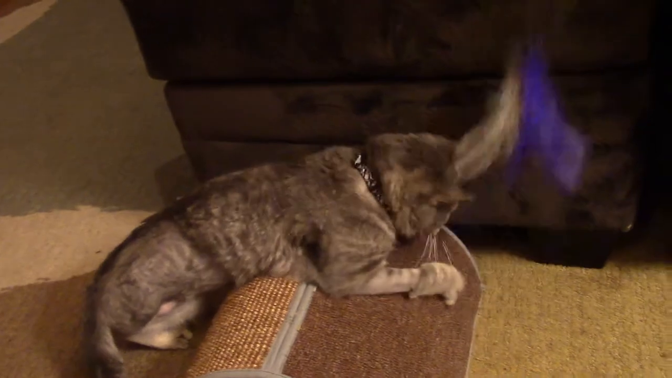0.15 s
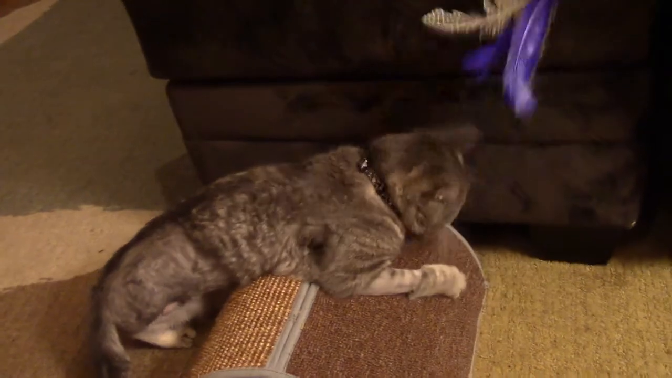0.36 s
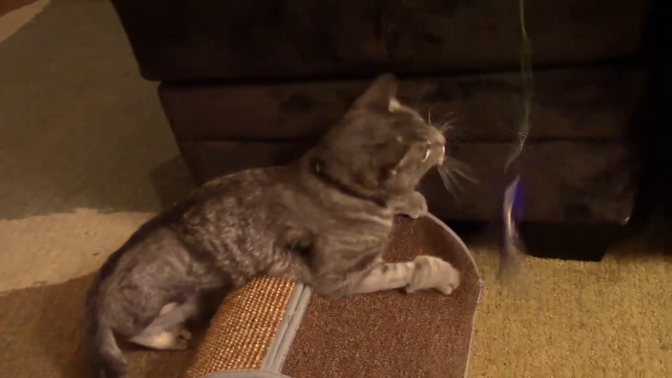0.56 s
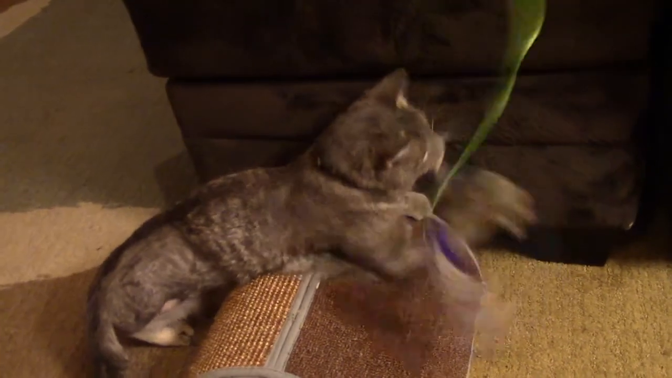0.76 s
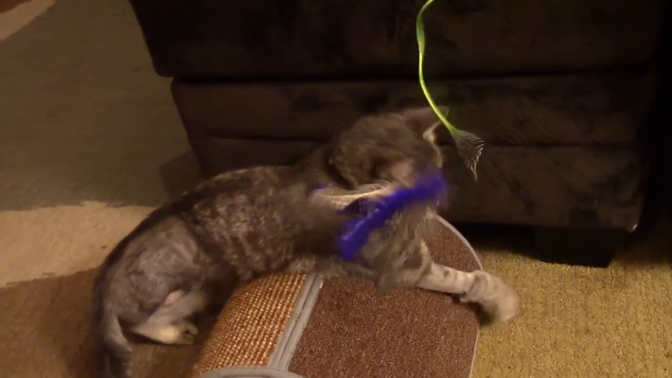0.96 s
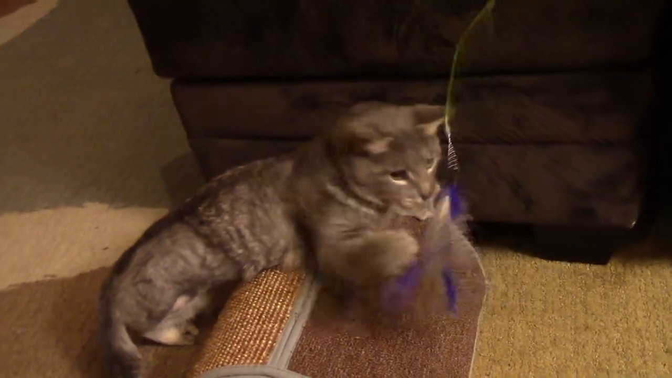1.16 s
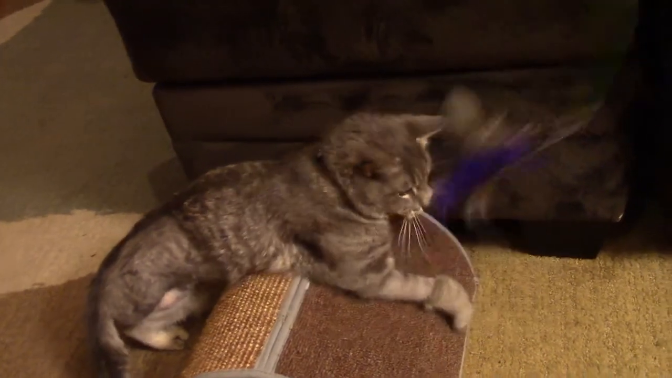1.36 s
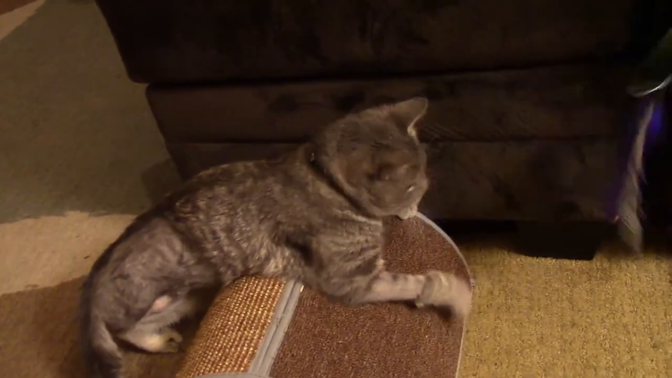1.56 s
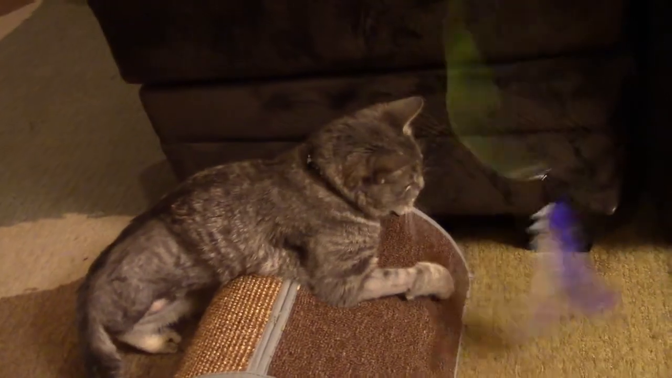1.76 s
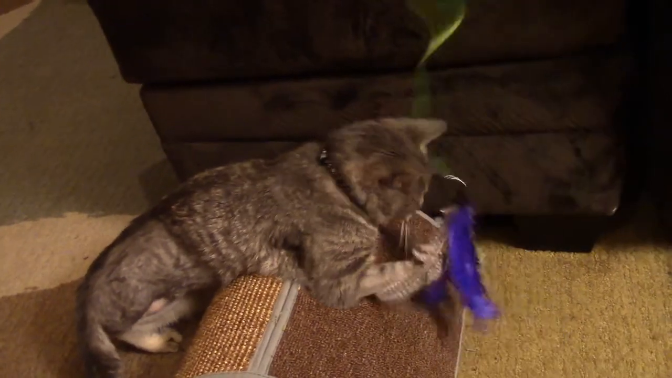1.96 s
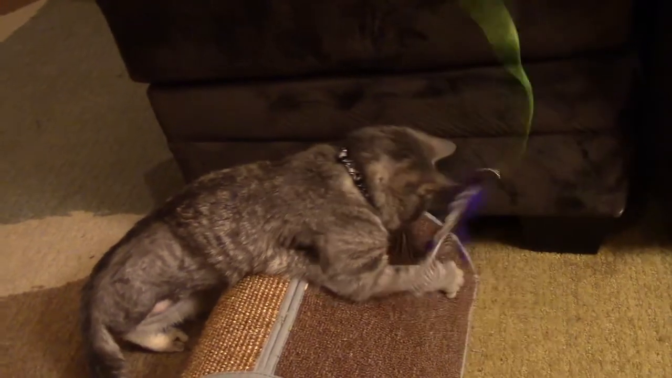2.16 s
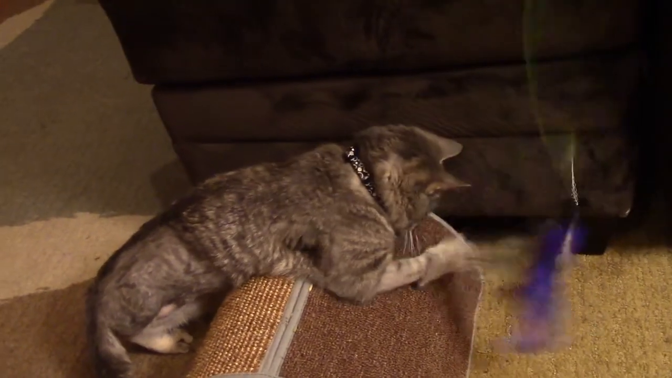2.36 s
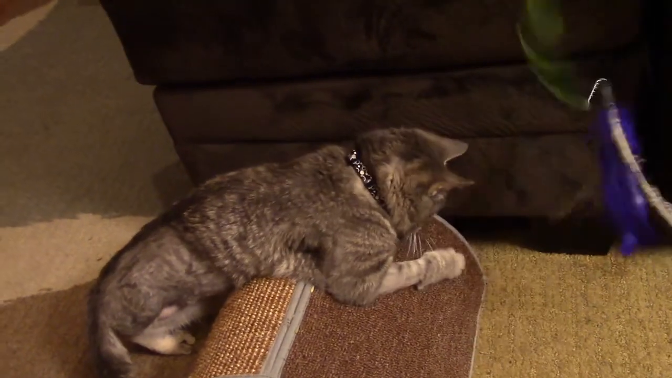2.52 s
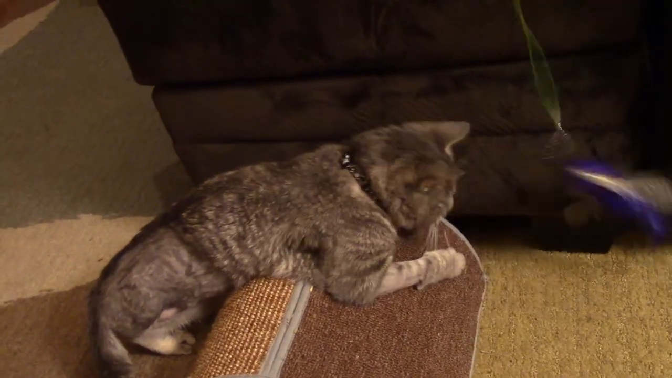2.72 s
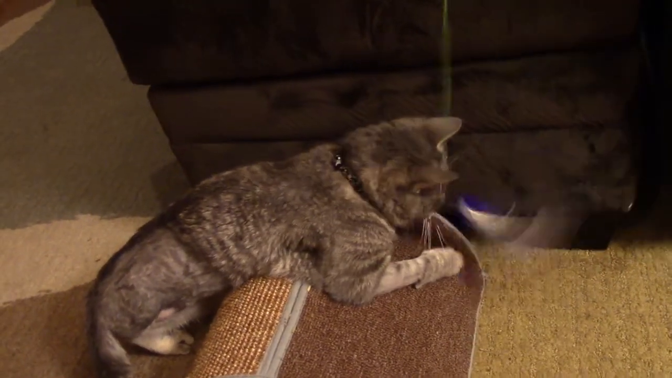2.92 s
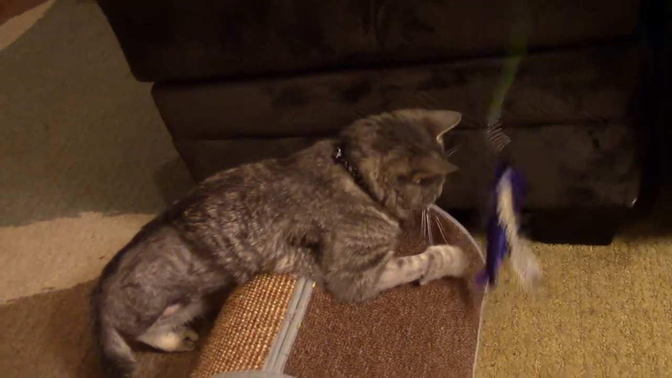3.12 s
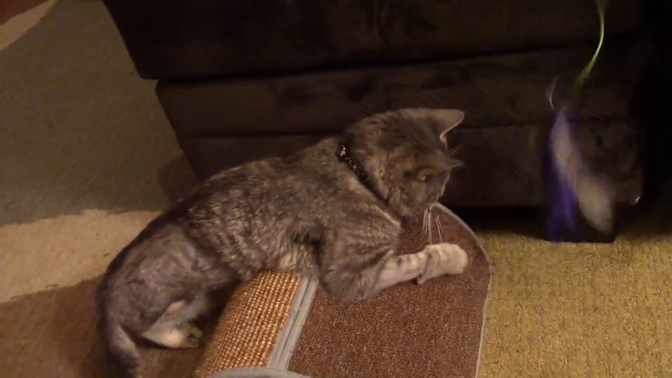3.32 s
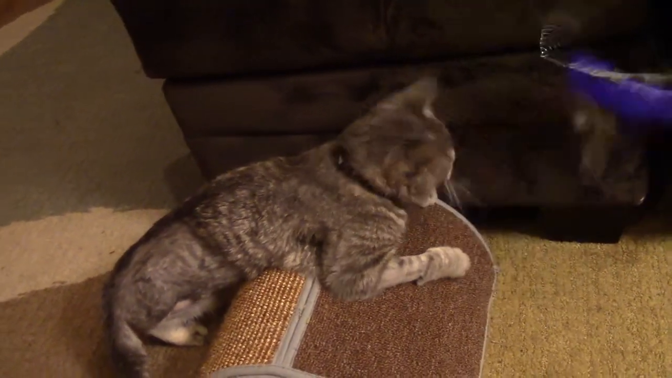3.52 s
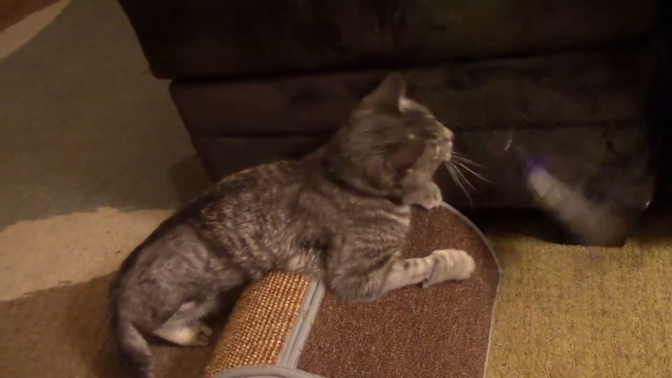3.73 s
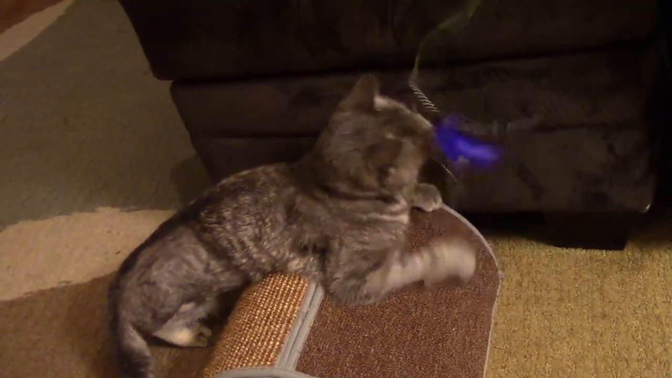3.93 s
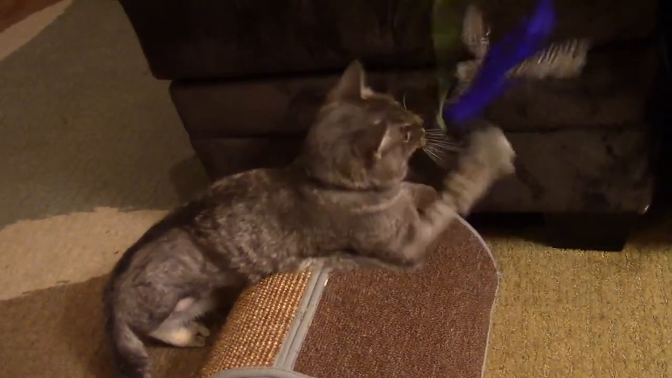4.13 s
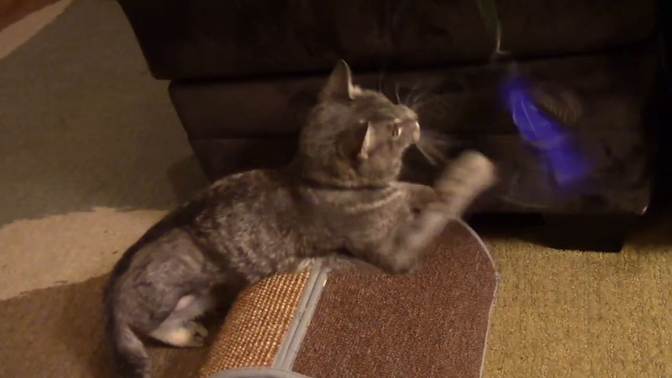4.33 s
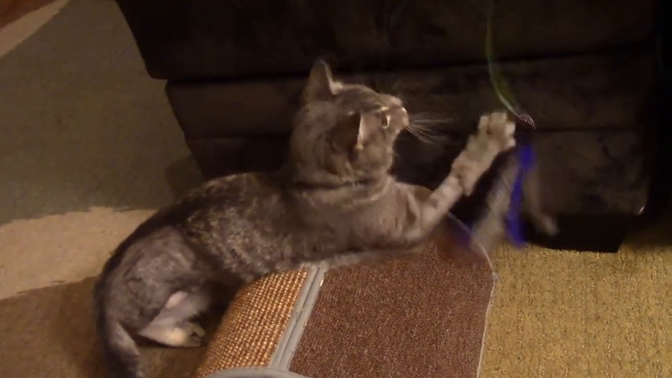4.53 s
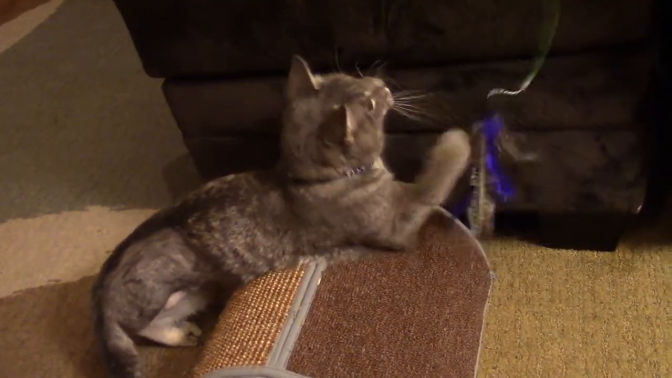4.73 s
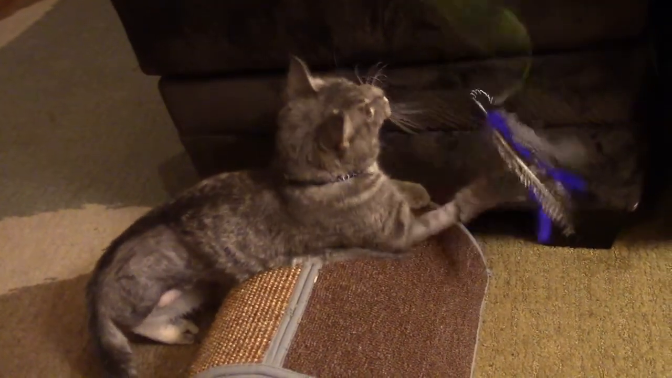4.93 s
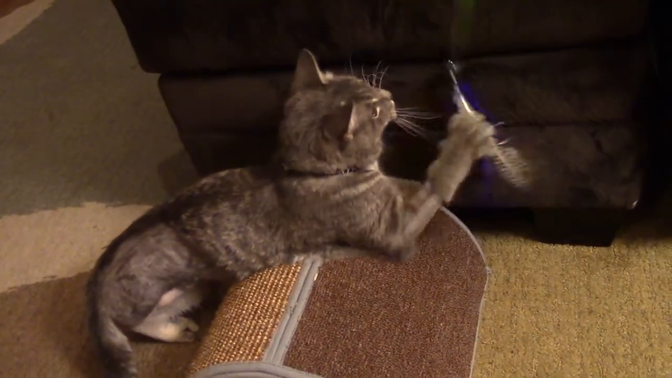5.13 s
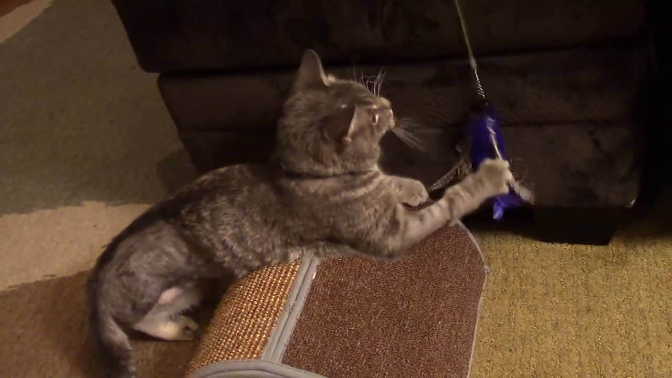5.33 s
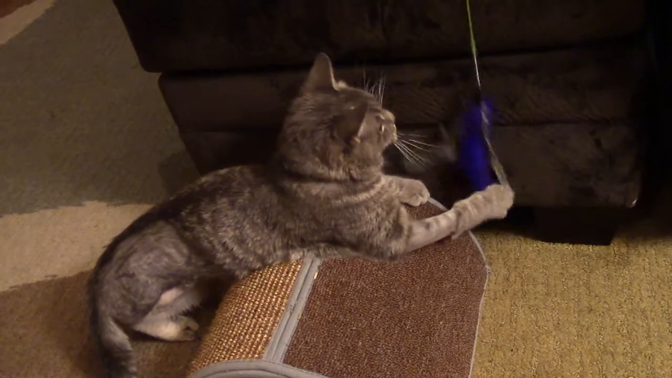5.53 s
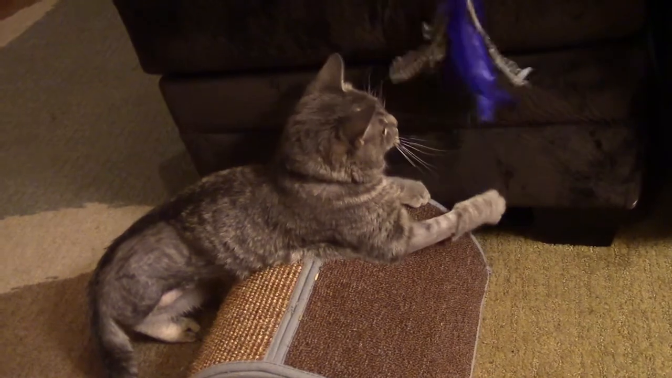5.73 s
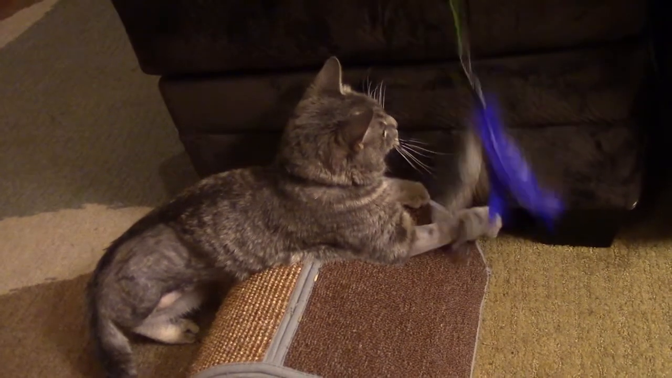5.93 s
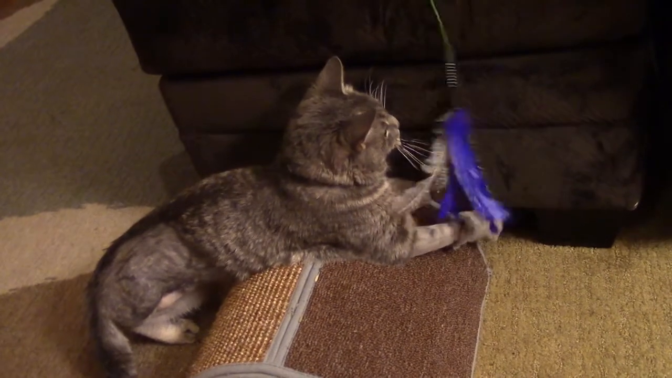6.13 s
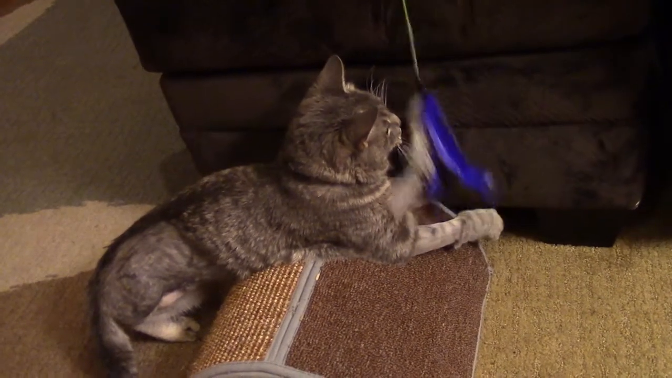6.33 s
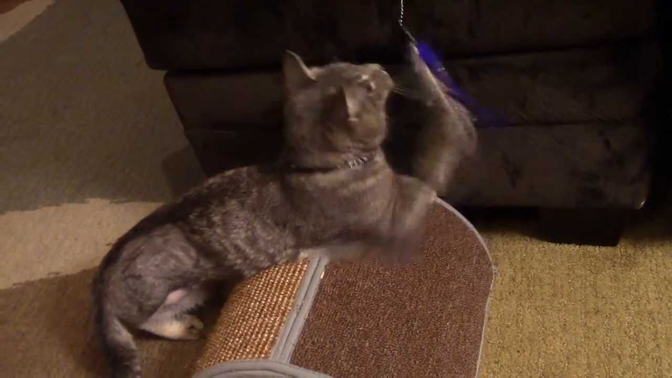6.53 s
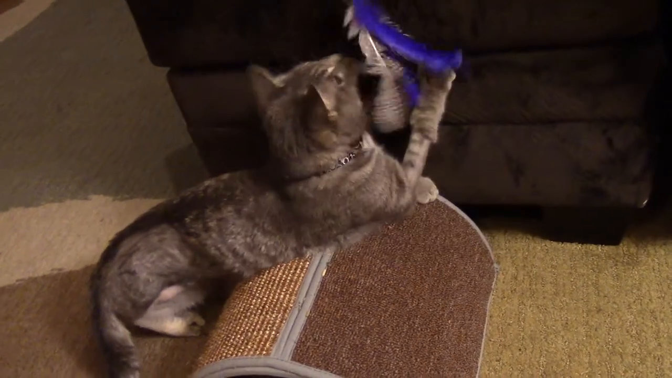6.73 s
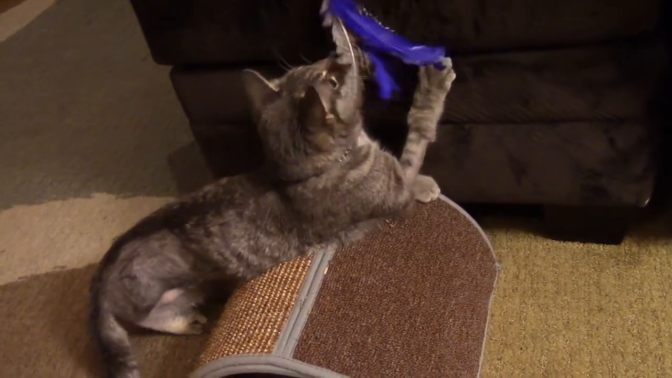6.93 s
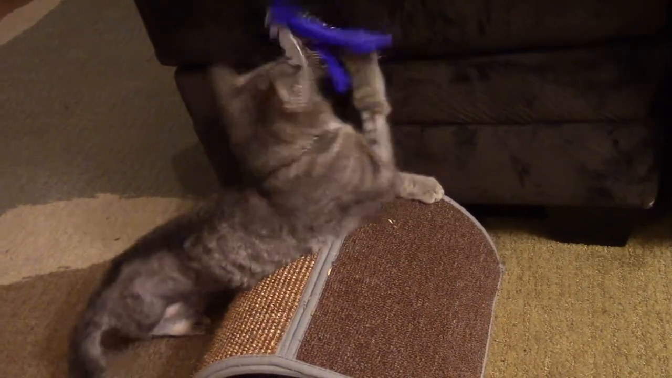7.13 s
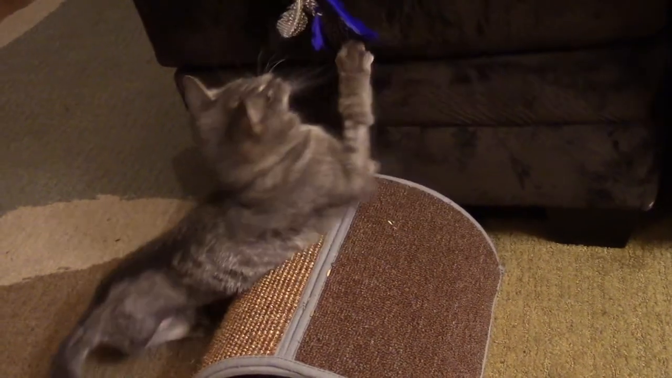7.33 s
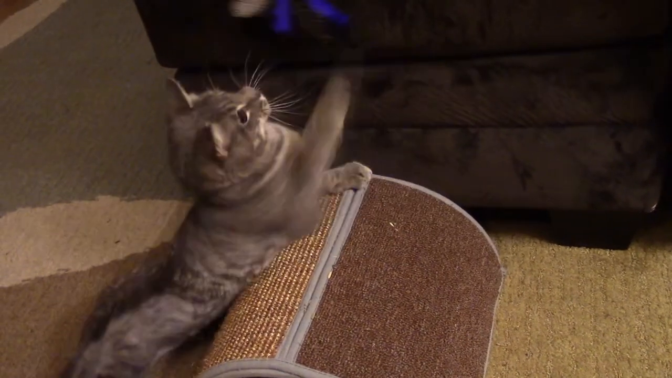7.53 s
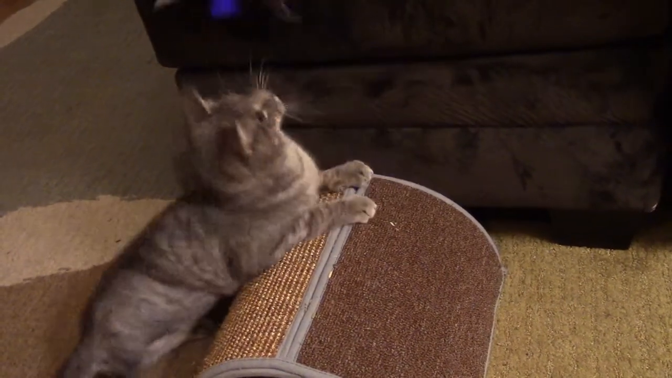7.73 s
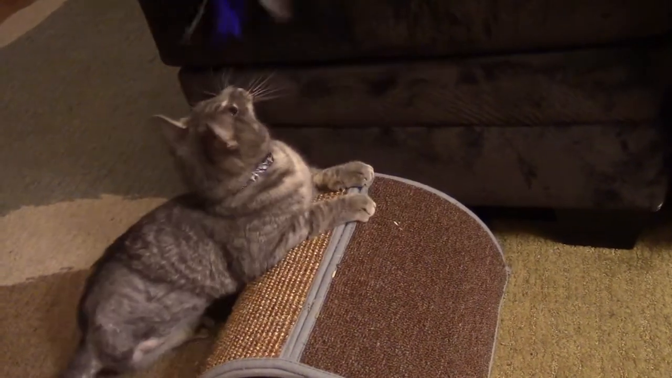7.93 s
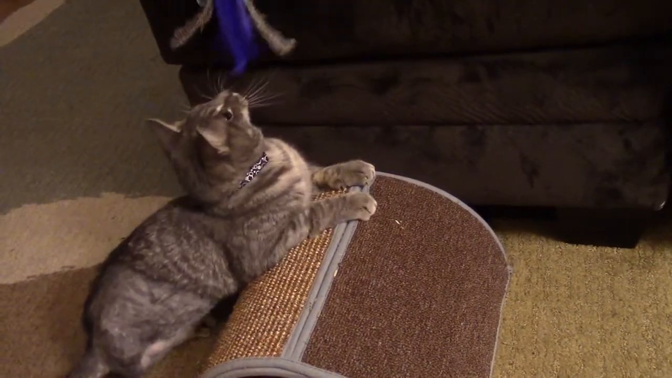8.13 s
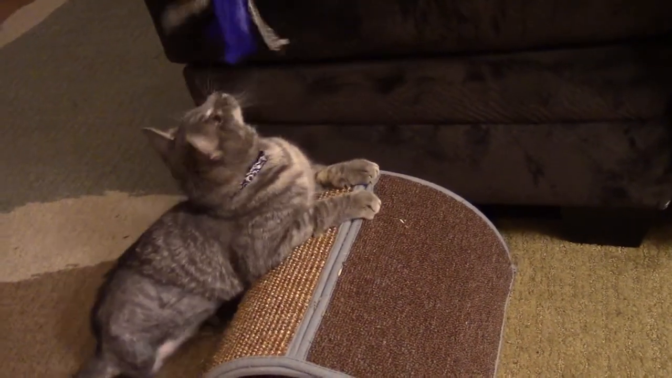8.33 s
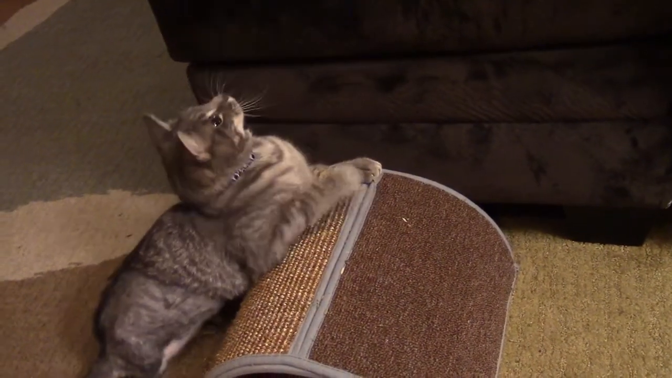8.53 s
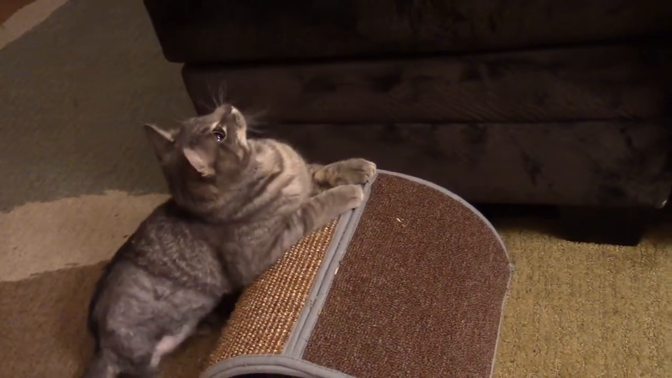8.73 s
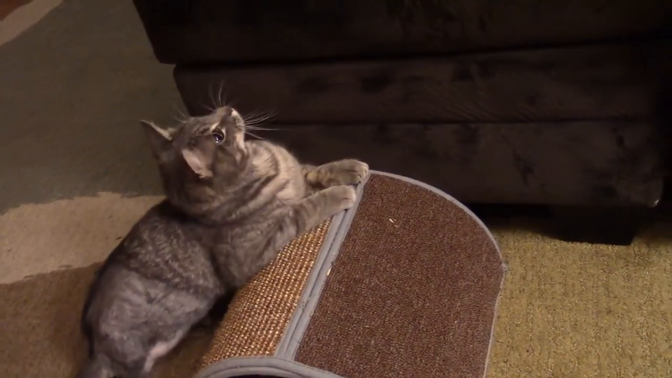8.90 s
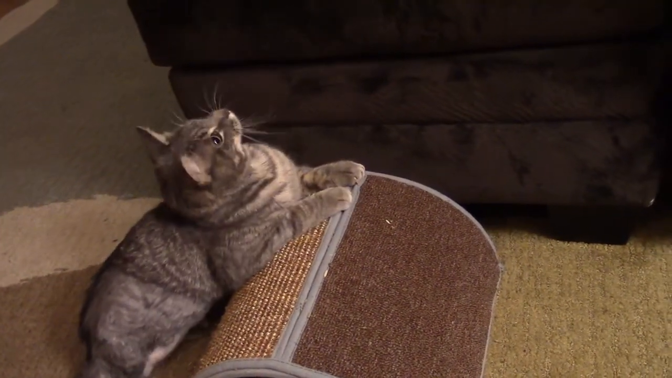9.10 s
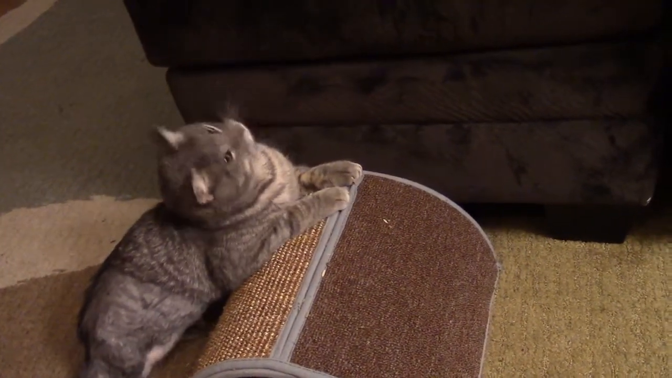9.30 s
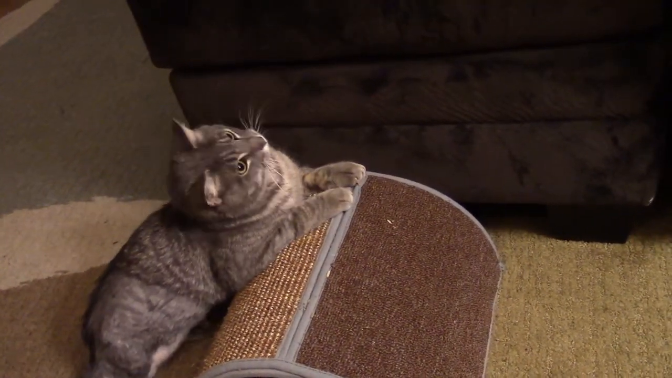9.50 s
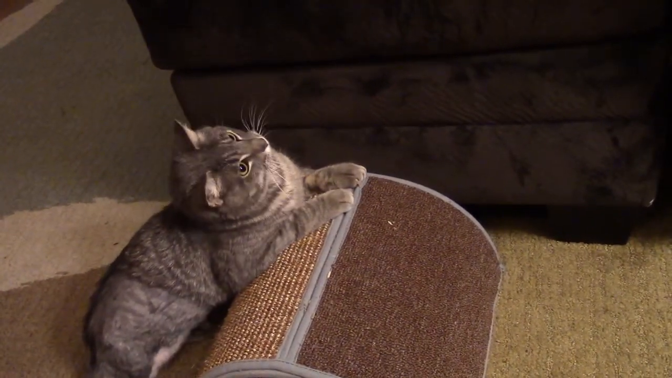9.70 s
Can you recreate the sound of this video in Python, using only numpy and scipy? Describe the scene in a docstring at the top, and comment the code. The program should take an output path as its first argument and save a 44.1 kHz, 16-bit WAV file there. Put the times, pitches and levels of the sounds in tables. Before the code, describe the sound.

Close up in a small, softly furnished room, a cat bats a feather toy on a carpeted scratcher. A busy opening flurry of clicks, claw scrapes and muffled hollow thumps thins to scattered taps, with a sharp clack near five seconds. The heaviest paw thuds come just after seven seconds, then a few light scratches fade into faint hum and soft shuffling.

```python
"""A cat's paws thump a hollow, carpeted scratcher as it lies there batting at a feather toy on a wand.
Each paw rings the board's modes and slaps its cover; claws and clasp tick and clack as damped resonances.
Dragged claws pluck the weave, and feathers and fur hiss over it as grainy filtered noise.
Soft shuffling, room hum, a deep drone and a faint whine lie under the play.
The room is small and soft; the camera's microphones are close, and the play is nearly mono."""
import sys
import numpy as np
from scipy import signal
from scipy.fft import rfft, irfft, next_fast_len
from scipy.io import wavfile
from scipy.ndimage import uniform_filter1d, map_coordinates

SR = 44100
rng = np.random.default_rng(int(sys.argv[2]) if len(sys.argv) > 2 else 0)


def generate_wav(signal):
    """Clip the signal to [-1, 1] and save it as 16-bit WAV at the path in sys.argv[1]."""
    frames = np.transpose(np.atleast_2d(signal))
    scaled = np.clip(frames, -1, 1) * 32767
    pcm = np.round(scaled).astype(np.int16)
    wavfile.write(sys.argv[1], SR, pcm)


N = 430411

# the room's air: pitch_hz [Hz], level_db [dB, relative]
AIR_SPECTRUM = [(15, -51), (25, -40), (37, -5), (50, -11.5), (76, -4), (133, -1), (241, -0.5), (307, -7.5),
                (486, -4), (749, -8), (1090, -12.5), (1250, -9.5), (2730, -16), (5370, -20), (15800, -36)]
# a faint, deep drone that comes and goes: time_s [s], level_db [dB]
DRONE_LEVEL = [(0, -70), (1.1, -70.5), (1.8, -77.5), (3.1, -67.5), (3.45, -86), (9.76, -82)]
# colour of that drone: pitch_hz [Hz], level_db [dB, relative]
DRONE_SPECTRUM = [(35, -34), (62, -16), (74, -5), (110, -31), (300, -72)]
# left-right likeness of the diffuse sounds: pitch_hz [Hz], likeness [0 to 1]
STEREO_LIKENESS = [(30, 0.48), (70, 0.92), (200, 0.66), (600, 0.59), (2000, 0.61), (5000, 0.91),
                   (12000, 0.99)]
# how long the room rings: pitch_hz [Hz], t60_s [s]
ROOM_DECAY = [(100, 0.3), (300, 0.46), (700, 0.33), (2000, 0.26), (5000, 0.39), (12000, 0.074)]
# what the furnishings send back: pitch_hz [Hz], level_db [dB, relative]
WALL_SPECTRUM = [(80, 3.5), (200, -7.5), (600, -2.5), (2200, -4.5), (4000, -10.5), (12000, -11)]
# soft shuffling of cat and wand, ahead of the layer trims: time_s [s], level_db [dB]
STIR_LEVEL = [(0, -55), (.35, -57), (3.5, -57.5), (6.3, -61.5), (7.1, -58.5), (9.76, -62.5)]
# colour of the shuffling: pitch_hz [Hz], level_db [dB, relative]
SHUFFLE_SPECTRUM = [(60, -22), (170, -7.5), (300, 3.5), (550, -4), (900, -3), (1500, -17), (2500, -15),
                    (5000, -30), (12000, -44)]
# feathers and fur brushing the cover, ahead of the layer trim: start_s [s], length_s [s], level_db [dB]
SWISH_STROKES = [(0, 0.069, -49.5), (0.165, 0.029, -59.5), (0.56, 0.038, -62.5), (0.698, 0.06, -60),
                 (1.065, 0.054, -61), (1.131, 0.032, -60.5), (1.169, 0.021, -54.5), (1.228, 0.036, -52),
                 (1.279, 0.055, -61), (1.356, 0.064, -58.5), (1.52, 0.042, -65.5), (1.68, 0.015, -64),
                 (2.266, 0.021, -58), (2.619, 0.027, -63.5), (3.302, 0.034, -65), (3.388, 0.024, -64),
                 (4.036, 0.052, -55.5), (4.119, 0.036, -67), (4.261, 0.036, -63), (4.839, 0.036, -56),
                 (5.007, 0.07, -62.5), (5.171, 0.089, -51.5), (5.276, 0.16, -66.5), (5.423, 0.21, -62),
                 (6.353, 0.15, -69.5), (6.555, 0.065, -60), (6.624, 0.065, -59.5), (7.016, 0.29, -66.5),
                 (7.088, 0.053, -62.5), (7.519, 0.058, -60), (7.65, 0.078, -65.5), (8.469, 0.034, -61)]
# colour of barbs and hairs: pitch_hz [Hz], level_db [dB, relative]
FEATHER_SPECTRUM = [(200, -15), (900, 4.5), (2200, 0.5), (3700, -0.5), (4700, -2), (6200, 1), (8000, -2.5),
                    (10500, -3), (13000, -7), (16000, -19)]
# claws dragging through the rough cover, ahead of the layer trim: start_s [s], length_s [s], level_db [dB]
CLAW_DRAGS = [(0.07, 0.034, -40), (0.17, 0.072, -52), (0.614, 0.023, -48.5), (1.53, 0.007, -50),
              (2.231, 0.054, -58.5), (2.46, 0.03, -68), (3.066, 0.032, -60), (4.539, 0.022, -55.5),
              (5.193, 0.065, -51.5), (7.208, 0.034, -52), (7.583, 0.043, -53), (7.662, 0.015, -46),
              (8.403, 0.026, -60), (8.464, 0.049, -52.5), (8.641, 0.031, -58.5), (8.943, 0.062, -62.5)]
# colour of plucked fibres: pitch_hz [Hz], level_db [dB, relative]
WEAVE_SPECTRUM = [(70, -22), (200, -4), (600, 0.5), (1100, 2), (1700, -2.5), (2300, -0.5), (3100, -10),
                  (4300, -19.5), (12000, -36)]
# claws, clasp and wand making contact: start_s [s], level_db [dB], pitch_hz [Hz], snap_db [dB, relative]
HARD_CONTACTS = [(0.0187, -43, 900, 8.5), (0.0412, -36, 3050, -1), (0.0626, -32.5, 1750, -30),
                 (0.0745, -29.5, 780, -26), (0.0924, -37.5, 2020, -22), (0.192, -49, 2340, -9),
                 (0.315, -40, 1040, -13.5), (0.5754, -47.5, 900, -5), (0.6239, -31.5, 1990, -15),
                 (1.0851, -44.5, 1120, -4), (1.104, -61, 1520, 10), (1.2322, -45.5, 970, -6),
                 (1.3157, -42.5, 2500, -10), (1.3788, -50.5, 2200, -5), (1.534, -43.5, 1550, -12),
                 (1.7207, -52.5, 1490, 4.5), (2.2659, -49, 2420, -9), (2.4915, -52, 2500, -22),
                 (2.7176, -48, 890, -5.5), (3.1088, -41.5, 2300, -9.5), (3.3273, -52.5, 1150, -0.5),
                 (3.4837, -45.5, 1020, -4), (3.6417, -45, 1030, -6), (3.6674, -41.5, 850, -34),
                 (3.8276, -52.5, 1140, -1), (4.0778, -60, 3650, 9), (4.217, -45, 1380, -14),
                 (4.3836, -48.5, 1050, -2), (4.5337, -46.5, 2700, -8.5), (4.729, -28, 765, -17.5),
                 (4.733, -39.5, 1410, -28), (4.8592, -50.5, 3720, 0.5), (4.91, -57.5, 4170, 5),
                 (5.0427, -40.5, 930, -20), (5.2448, -29.5, 3920, -3), (5.2458, -33, 1450, -23),
                 (5.343, -47.5, 2410, -10), (5.5986, -52.5, 1360, -3), (6.5958, -56.5, 3560, 9.5),
                 (6.6078, -62, 4500, 13), (6.6435, -54.5, 3850, 4), (7.002, -38, 1460, -12.5),
                 (7.0089, -31, 940, -22), (7.0096, -36.5, 2850, -12), (7.181, -46.5, 2040, -10),
                 (7.214, -48, 2430, -8), (7.231, -38.5, 1890, -17), (7.2456, -44, 2320, -13),
                 (7.2607, -48, 2900, -16), (7.2711, -29, 2240, -20), (7.5326, -32, 1040, -6),
                 (7.7852, -45, 1730, -16), (7.8593, -43.5, 2400, -20), (8.4113, -49, 2450, -16),
                 (8.419, -43.5, 2100, -21), (8.4649, -34.5, 1720, -17.5)]
# snap of a hard tip: pitch_hz [Hz], level_db [dB, relative]
SNAP_SPECTRUM = [(1500, -22), (3800, 1.5), (5000, 2.5), (6500, 5.5), (8000, 3.5), (10700, 0.5), (13000, -7),
                 (16000, -10.5)]
# paws landing on the board: start_s [s], level_db [dB], pitch_hz [Hz, centre of the ring]
PAW_LANDINGS = [(0.02, -43.5, 388), (0.066, -32.5, 356), (0.382, -43, 330), (0.624, -38, 332),
                (1.086, -48.5, 315), (1.238, -42, 250), (1.318, -34, 228), (1.546, -39, 410),
                (1.557, -36, 189), (2.135, -39.5, 230), (2.267, -47, 292), (2.625, -44.5, 237),
                (3.496, -44.5, 207), (3.667, -34.5, 290), (4.177, -40, 165), (4.365, -45.5, 174),
                (4.7292, -32.5, 317), (4.963, -34.5, 168), (5.044, -37, 288), (5.223, -37.5, 240),
                (5.587, -55, 380), (5.989, -49.5, 262), (6.585, -49.5, 255), (6.68, -37.5, 215),
                (6.888, -48, 130), (7.0101, -24, 265), (7.128, -47.5, 260), (7.271, -37.5, 349),
                (7.5328, -25.5, 317), (7.5867, -28, 246), (7.665, -33, 303), (8.47, -43, 343),
                (8.643, -51, 316)]
# modes of the hollow board, before chance shifts: pitch_hz [Hz], level_db [dB, relative], t60_s [s]
BOARD_MODES = [(118, -15.5, 0.137), (169, -0.5, 0.058), (198.8, -2.5, 0.064), (246, 1, 0.055),
               (301.8, 3, 0.035), (371, -16, 0.14), (499.5, -4, 0.11), (712, 9, 0.065)]
# a pad slapping the cover: pitch_hz [Hz], level_db [dB, relative]
SLAP_SPECTRUM = [(150, -34.5), (400, 8.5), (700, 0), (1100, -10), (1800, -8.5), (3200, -30.5), (8000, -58)]

SWING_DB = 0.4  # typical side-to-side drift of ticks, rasps and brushing
TOP_HZ = 15850  # upper band limit at the microphone
SLAP_DB_PER_OCTAVE, SLAP_PIVOT_HZ = 18.5, 261  # a flatter, quicker landing rings higher and slaps more
SLAP_GROWTH, USUAL_PAW_DB = 0.57, -37  # dB of slap per dB of blow: heavy blows are mostly thump
HEEL_S, HEEL_DB, HEEL_PITCH = 0.00797, -11.5, 0.68  # heel after toes: lag before chance, level, pitch ratio
# tips chatter briefly on the weave; small hard ones, above the knee, stop sooner
CHATTER_T60_S, CHATTER_KNEE_HZ = 0.023, 3400
# each tip then touches once more: lag before chance, level, pitch ratio
REBOUND_S, REBOUND_DB, REBOUND_PITCH = 0.0072, -12.5, 0.57
# a quill ticks in each swish: level over the stroke's table level, pitch before chance, relative snap
QUILL_DB, QUILL_HZ, QUILL_SNAP_DB = 2.5, 1670, 0.5


def amp(db):
    """Amplitude of a level in dB."""
    return 10 ** (np.asarray(db) / 20)


def unit(x):
    """x scaled to rms 1."""
    return x / np.sqrt(np.mean(x ** 2) + 1e-20)


def crest(x, size):
    """x scaled so that its loudest stretch of size samples has rms 1."""
    return x / np.sqrt(uniform_filter1d(x ** 2, size, mode="constant").max() + 1e-20)


def along(points, hz):
    """(pitch_hz, value) points read on a log frequency axis."""
    f, v = np.transpose(points)
    return np.interp(np.log(hz + 1), np.log(f), v)


def curve(rows):
    """(time_s, value) rows joined by straight lines, one value per sample."""
    return np.interp(np.arange(N) / SR, *np.transpose(rows))


def wobble(rate):
    """A smooth random curve, rate knots a second."""
    knots = rng.standard_normal(int(N * rate / SR) + 4)
    return map_coordinates(knots, [np.arange(N) * rate / SR])


def coloured(x, gain):
    """x through the causal minimum-phase filter whose gain is a function of frequency."""
    n = x.shape[-1]
    m = 2 * next_fast_len(n // 2 + 4096)
    log_gain = np.log(np.maximum(gain(np.fft.rfftfreq(m, 1 / SR)), 1e-6))
    cepstrum = irfft(log_gain)
    # folding the cepstrum forward in time makes the filter causal
    cepstrum[1:m // 2] *= 2
    cepstrum[m // 2 + 1:] = 0
    return irfft(rfft(x, m) * np.exp(rfft(cepstrum)), m)[..., :n]


def shaped(x, spectrum):
    """x filtered by a spectrum of (pitch_hz, level_db) points."""
    return coloured(x, lambda hz: amp(along(spectrum, hz)))


def add(track, s, sound):
    """Mix a sound in at s seconds."""
    part = track[max(round(s * SR), 0):][:len(sound)]
    part += sound[:len(part)]


def contact(t, t60, chatter):
    """One push with a dying chatter of tiny touches."""
    tiny = rng.standard_normal(len(t)) * amp(-60 * t / t60)
    return (t == 0) + chatter * tiny / np.linalg.norm(tiny)


def airy(spectrum):
    """Stereo noise of rms 1, whose likeness at the two microphones depends on frequency."""
    def half_angle(hz):
        return np.arccos(np.clip(along(STEREO_LIKENESS, hz), 0, .999)) / 2
    mid, side = shaped(rng.standard_normal((2, N)), spectrum)
    mid = coloured(mid, lambda hz: np.cos(half_angle(hz)))
    side = coloured(side, lambda hz: np.sin(half_angle(hz)))
    return unit(np.array([mid + side, mid - side]))


def background(air_db=-61, whine_db=-85.0):
    """Steady room air as filtered noise, with a deep drone and a faint electrical whine."""
    air = amp(air_db) * airy(AIR_SPECTRUM)
    drone = amp(curve(DRONE_LEVEL)) * airy(DRONE_SPECTRUM)
    phase = 2 * np.pi * 5561 * np.arange(N) / SR + wobble(15)  # a 5561 Hz tone, slightly unsteady
    whine = amp(whine_db) * np.sqrt(2) * np.sin(phase)
    return air + drone + whine


def room(x, width=0.034):
    """Floor and furniture answer after a few ms; each frequency dies at its own speed."""
    hz, t, z = signal.stft(rng.standard_normal((2, SR // 2)), SR, nperseg=256)
    decay = amp(-60 * t / along(ROOM_DECAY, hz)[:, None])
    tail = signal.istft(z * decay, SR, nperseg=256)[1]
    tail *= 1 - np.exp(-(np.arange(tail.shape[1]) / SR / 0.0029) ** 2)  # 2.9 ms build-up
    mid, side = shaped(tail / np.linalg.norm(tail[0]), WALL_SPECTRUM)
    response = np.array([mid + width * side, mid - width * side])
    return signal.fftconvolve(x[None], response, axes=1)[:, :N]


def fidgets(shuffle_db=-2, rustle_db=-12, catches=600):
    """The cat shifts its weight in low noise; the toy on its string flutters in grainy noise."""
    shuffle = amp(shuffle_db + 2.0 * wobble(12)) * airy(SHUFFLE_SPECTRUM)
    grains = (rng.random(N) < catches / SR) * (rng.random(N) - .5)  # catches a second
    rustle = shaped(unit(grains) + rng.standard_normal(N), FEATHER_SPECTRUM)
    flutter = unit(rustle * amp(3.3 * wobble(16)))
    return amp(curve(STIR_LEVEL)) * (shuffle + amp(rustle_db) * flutter)


def swishes(level_db=2, rise=0.0063, clump_db=3, catches=380, catch_share=0.63):
    """Barbs and hairs slide over the weave: a fine hiss with clumps of tiny catches."""
    stroke, t = np.zeros(N), np.arange(SR // 2) / SR
    for start_s, length_s, db in SWISH_STROKES:
        add(stroke, start_s, amp(db) * (1 - np.exp(-t / rise)) / (1 + (t / length_s) ** 8))
    grains = (rng.random(N) < catches / SR) * rng.standard_normal(N)  # catches a second
    friction = shaped(rng.standard_normal(N) + catch_share * unit(grains), FEATHER_SPECTRUM)
    return amp(level_db) * stroke * unit(friction * amp(clump_db * wobble(110)))


def rasps(level_db=-1, slips=450, hiss_share=0.57, rise=0.00068):
    """A dragged claw plucks one fibre after another at an uneven rate."""
    stroke, t = np.zeros(N), np.arange(SR // 4) / SR
    for start_s, length_s, db in CLAW_DRAGS:
        add(stroke, start_s, amp(db) * (1 - np.exp(-t / rise)) / (1 + (t / length_s) ** 12))
    plucks = (rng.random(N) < slips / SR) * (rng.random(N) - .5)  # slips a second
    fibres = shaped(unit(plucks) + hiss_share * rng.standard_normal(N), WEAVE_SPECTRUM)
    return amp(level_db) * stroke * unit(fibres)


def touches():
    """Every tick with its weaker, duller rebound, and a stray quill in each swish, as tick rows."""
    rows = []
    rebound_lags = rng.uniform(0.531, 1.4, len(HARD_CONTACTS))
    for (start_s, db, pitch_hz, snap_db), lag in zip(HARD_CONTACTS, rebound_lags):
        rows.append((start_s, db, pitch_hz, snap_db))
        rows.append((start_s + lag * REBOUND_S, db + REBOUND_DB, pitch_hz * REBOUND_PITCH, snap_db))
    quill_chances = rng.uniform(-0.92, 1, (len(SWISH_STROKES), 2))
    for (start_s, length_s, db), (when, octaves) in zip(SWISH_STROKES, quill_chances):
        quill_s = start_s + length_s * (1 + when) / 2
        rows.append((quill_s, db + QUILL_DB, QUILL_HZ * 2 ** octaves, QUILL_SNAP_DB))
    return rows


def ticks(clack_db=0, snap_db=0, width_hz=880, bass_share=0.34, top_ratio=4.7, snap_share=0.46):
    """A hard tip snaps brightly and knocks a quickly damped resonance."""
    out, t = np.zeros(N), np.arange(SR // 8) / SR
    for start_s, db, pitch_hz, snap in touches():
        t60 = CHATTER_T60_S / (1 + (pitch_hz / CHATTER_KNEE_HZ) ** 4)

        def body(hz):
            r = hz / pitch_hz
            # all ring about equally long: low knocks are toneless, high ones ping
            resonance = 1 / abs(1 - r ** 2 + 1j * r * width_hz / pitch_hz)
            # small parts radiate little bass, and the contact time dulls the top
            return resonance * r / np.hypot(r, bass_share) / np.hypot(1, r / top_ratio)

        clack = coloured(contact(t, t60, chatter=0.95), body)
        tip = shaped(contact(t, t60 * snap_share, chatter=1.7), SNAP_SPECTRUM)
        add(out, start_s, amp(db + clack_db) * crest(clack, size=130))
        add(out, start_s, amp(db + snap + snap_db) * crest(tip, size=130))
    return out


def landings():
    """Toes, then the softer, lower heel, of every paw: (start_s, level_db, pitch_hz, slap_db relative)."""
    rows = []
    heel_lags = rng.uniform(0.64, 1.458, len(PAW_LANDINGS))
    for (start_s, db, hz), lag in zip(PAW_LANDINGS, heel_lags):
        rows.append((start_s, db, hz))
        rows.append((start_s + lag * HEEL_S, db + HEEL_DB, hz * HEEL_PITCH))
    start_s, db, hz = np.transpose(rows)
    slap_db = SLAP_DB_PER_OCTAVE * np.log2(hz / SLAP_PIVOT_HZ)
    slap_db = slap_db + (SLAP_GROWTH - 1) * (db - USUAL_PAW_DB)
    return zip(start_s, db, hz, slap_db)


def paws(ring_db=0, slap_db=-14, reach=0.49, rise=0.0025, slap_t60=0.055, radiate_hz=110):
    """Each paw rings the board; where it lands decides which modes answer most."""
    out, t = np.zeros(N), np.arange(SR // 4) / SR
    hz, level, t60 = np.transpose(BOARD_MODES)[:, :, None]
    for start_s, db, centre_hz, slap in landings():
        loading, luck = rng.standard_normal((2, len(BOARD_MODES), 1))
        octaves_away = np.log2(hz / centre_hz)
        weight = amp(level + 1.0 * luck) / (1 + (octaves_away / reach) ** 4)
        mode_hz = hz * (1 + 0.044 * loading)  # the cat's weight shifts the modes
        modes = weight * amp(-60 * t / t60) * np.sin(2 * np.pi * mode_hz * t)
        ring = modes.sum(axis=0) * (1 - np.exp(-(t / rise) ** 2))  # a soft pad loads the board gradually
        pad = shaped(contact(t, slap_t60, chatter=1.1), SLAP_SPECTRUM)
        add(out, start_s, amp(db + ring_db) * crest(ring, size=220))
        add(out, start_s, amp(db + slap + slap_db) * crest(pad, size=220))
    # air slips round the open board, so it radiates little deep bass
    return signal.sosfilt(signal.butter(2, radiate_hz, "high", fs=SR, output="sos"), out)


def scene(paw_room_db=-9, tick_room_db=-7, swish_room_db=-8):
    """The play close to the microphones, its echo and the quiet room."""
    thumps = paws()
    claws = ticks() + rasps()
    brushing = swishes()
    echo = room(amp(paw_room_db) * thumps + amp(tick_room_db) * claws + amp(swish_room_db) * brushing)
    swing = amp(SWING_DB * wobble(4.4) * np.array([[1], [-1]]))  # one side rises as the other falls
    return thumps + swing * (claws + brushing) + echo + fidgets() + background()


def record(dry, low_hz=55):
    """The camera's microphones thin the deep bass and keep nothing above the band limit."""
    thin = signal.sosfilt(signal.butter(2, low_hz, "high", fs=SR, output="sos"), dry)
    m = next_fast_len(N + SR // 2)
    passband = np.fft.rfftfreq(m, 1 / SR) < TOP_HZ
    return irfft(rfft(thin, m) * passband, m)[:, :N]


dry = scene()
out = record(dry)
generate_wav(out)
```